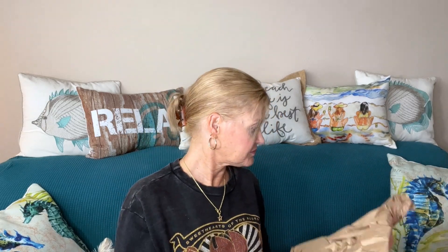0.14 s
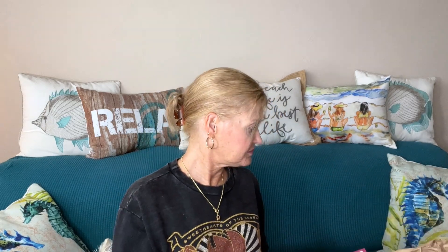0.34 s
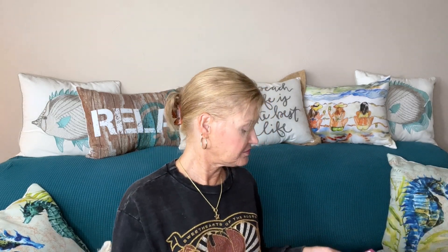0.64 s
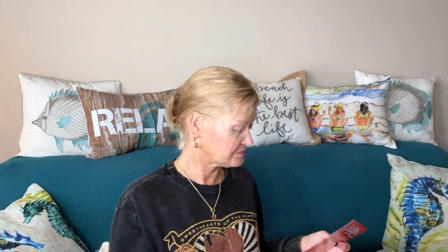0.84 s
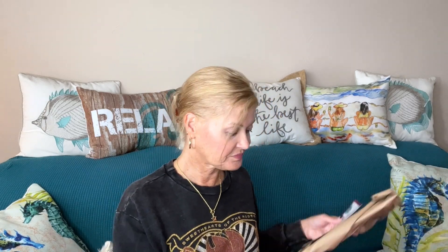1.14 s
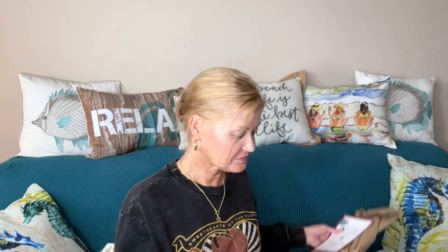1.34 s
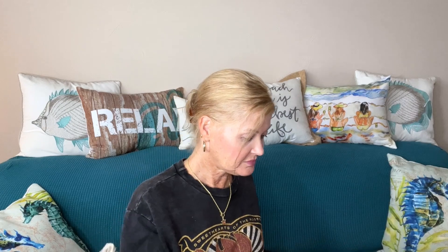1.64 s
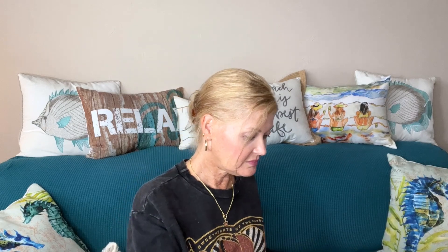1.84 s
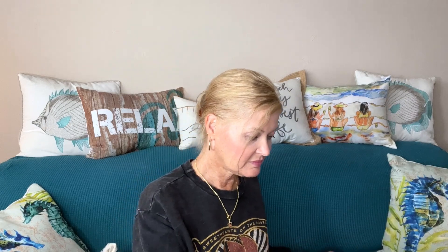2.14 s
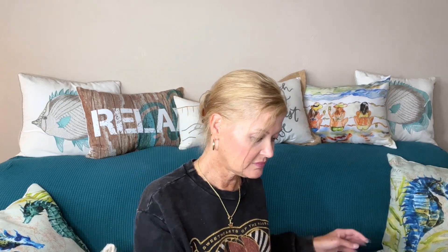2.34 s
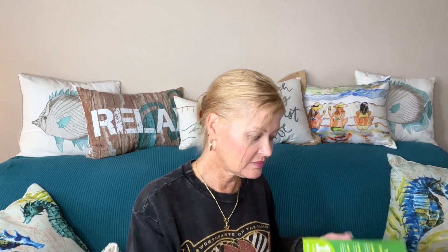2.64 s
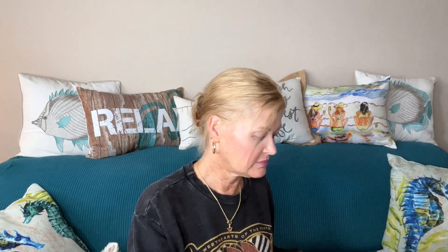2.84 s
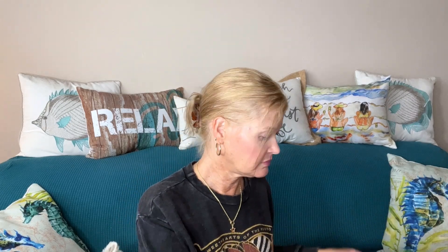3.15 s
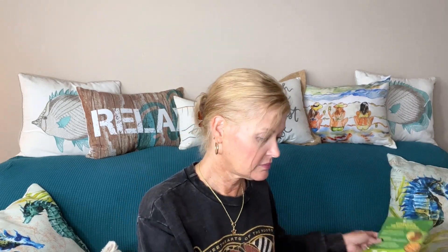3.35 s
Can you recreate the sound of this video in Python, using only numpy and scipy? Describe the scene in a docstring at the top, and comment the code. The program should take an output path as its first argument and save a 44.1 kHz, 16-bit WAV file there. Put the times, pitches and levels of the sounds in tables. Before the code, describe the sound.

Packing paper rustles and crackles in irregular bursts as hands dig in a cardboard box.

```python
"""Packing paper rustles from the first instant, over a faint appliance hum and the air of a soft furnished room.
Hands dig in a cardboard box to one side of a two-port microphone. Dense tiny buckles ring to make the rustle,
folds snap one by one as flurries of slips, and the box wall is rubbed and knocked so that its modes ring.
Late on, a small hard thing is tapped once. Short reflections surround paper, box and tap."""
import sys
import numpy as np
from scipy import signal
from scipy.fft import rfft, irfft, next_fast_len
from scipy.io import wavfile

SR = 44100
rng = np.random.default_rng(int(sys.argv[2]) if len(sys.argv) > 2 else 0)


def to_wav(sig):
    """Store sig (one row per channel, or 1-D mono) as 16-bit WAV at the path in sys.argv[1].

    Samples outside -1..1 are clipped; the rate is SR.
    """
    pcm = np.clip(np.atleast_2d(sig), -1, 1) * 32767
    pcm = np.round(pcm).astype(np.int16)
    wavfile.write(sys.argv[1], SR, pcm.T)  # frames by channels


def nominal_scale(level):
    """Amplitude ratio for a level in decibels (scalar or array-like)."""
    x = np.asarray(level, float) / 20
    return 10 ** x


N = 154350  # samples
PAD = next_fast_len(N + SR)
HZ = np.arange(PAD // 2 + 1) * SR / PAD

# Levels at the sources come before the ports, the room and the microphone's colour.

# appliance hum: (frequency [Hz], rms level [dB])
HUM_TONES = [(59, -78), (119, -57.5), (293, -72)]
HUM_WAVER_DB, HUM_WAVER_HZ = 1.2, 4.5
# spectrum of the room air: (frequency [Hz], relative level [dB])
AIR_SPECTRUM = [(30, 7.5), (70, 17), (140, 1.5), (400, -11), (1400, -18), (4000, -30), (7000, -35.5),
                (12000, -57)]
AIR_RMS_DB = -60

# the sheet is crumpled or dragged:
# (time [s], length [s], peak position [share of length], level [dB], brightness [dB per octave])
PAPER_STROKES = [(0.0, 0.023, 0.033, -33, -2.5), (0.049, .07, 0.48, -55, -1.5),
                 (0.106, 0.12, 0.5, -31.5, -1.5), (0.206, 0.086, 0.27, -42, 1.5),
                 (0.274, 0.079, 0.41, -37.5, .3), (0.376, 0.17, 0.25, -33.5, 3),
                 (0.546, 0.29, 0.36, -56, -2), (0.939, 0.19, 0.49, -32, 4), (1.109, 0.045, .2, -38.5, -1),
                 (1.161, 0.083, 0.37, -31, -0.9), (1.359, 0.019, 0.059, -40.5, -3),
                 (1.529, 0.19, 0.11, -35, 0.1), (1.669, 0.15, 0.054, -34, -1),
                 (1.835, 0.099, .15, -45, 1.5), (1.939, 0.19, 0.32, -35.5, 0.3),
                 (2.132, 0.12, 0.17, -32.5, -2.5), (2.277, .14, 0.84, -61.5, 4),
                 (2.638, 0.23, 0.42, -39, 1.5), (2.816, 0.05, 0.32, -33, -12),
                 (3.047, 0.16, 0.26, -36.5, -1.6), (3.209, 0.23, 0.49, -59, -5.5),
                 (3.453, 0.05, 0.78, -59, -7.5)]
# how strongly each size of buckle sounds: (frequency [Hz], relative level [dB])
BUCKLE_SPECTRUM = [(400, -4.5), (700, -7.5), (1200, 0.5), (2200, 1), (3200, -2.5), (4500, -7.5),
                   (6500, -13), (9000, -5), (12000, -3.5)]
PARTS, SIZES = 3, 34  # places on the sheet, sizes of buckle
BUCKLES_PER_S, BUCKLE_SPREAD_DB = 2000, 2.8  # in each part of the sheet
BUCKLE_CYCLES = 18  # cycles to fall 60 dB
BRIGHT_PIVOT_HZ = 2500
COLOUR_DB, COLOUR_HZ = 1.5, 21.8  # each size of buckle comes and goes

# shape of a hand stroke
ATTACK_S, ATTACK_SHARE = 0.002, 0.3  # the share is of the time to the peak
SWELL_DB, RELEASE_DB_PER_S = 12.5, 901

# the box wall is rubbed: (time [s], length [s], level [dB])
WALL_RUBS = [(0.091, 0.26, -38.5), (0.422, 0.14, -39.5), (0.969, 0.13, -33), (1.363, 0.041, -45),
             (1.545, 0.093, -39), (1.716, 0.093, -37.5), (1.934, 0.19, -36), (2.134, 0.11, -24.5),
             (2.642, 0.11, -39), (2.82, 0.042, -32), (3.067, 0.12, -38.5)]
# modes of the cardboard box: (frequency [Hz], relative level [dB], 60 dB decay [s])
BOX_MODES = [(162.6, -1, 0.038), (310, -5, 0.1), (398, 4, .04), (496, -3.5, .04), (642, 8.5, 0.017),
             (804, 1.5, 0.037)]
RUBS_PER_S, RUB_SPREAD_DB = 820, 5.5
RUB_PEAK = 0.38  # share of the length

# folds that snap and knocks on the wall:
# (time [s], level before SNAP_DB [dB], pitch [Hz], decay constant of the slips [ms])
FOLD_SNAPS = [(0.121, -22, 1580, 2.9), (0.161, -17.5, 1590, 4.5), (0.172, -17, 1106, 5.5),
              (0.239, -29.5, 1460, 6.2), (0.491, -33, 4700, 18), (0.592, -48.5, 1080, 22),
              (0.973, -34.5, 1810, 13), (1.015, -24, 5750, 6.1), (1.022, -27.5, 1240, 26),
              (1.051, -23, 1610, 17), (1.103, -20.5, 1730, 5), (1.354, -35.5, 2560, 2.35),
              (1.362, -29, 174.5, 14), (1.53, -24, 824, 3.3), (1.553, -30, 590, 2.2),
              (1.599, -24, 645, 5.2), (1.677, -16.5, 1412, 3.7), (1.851, -40.5, 1030, 9.1),
              (1.867, -31, 920, 6.7), (1.883, -35, 233, 3), (1.964, -33.5, 310, 3.7),
              (1.981, -31, 1390, 13), (2.004, -30, 1274, 14), (2.048, -34, 505, 28),
              (2.126, -25.5, 340, 19), (2.147, -19.5, 890, 5.2), (2.159, -26, 310, 19),
              (2.205, -31, 510, 10), (2.216, -24.5, 648, 1.9), (2.66, -29.5, 343, 35),
              (2.692, -28, 2170, 3.6), (2.786, -23, 1300, 3), (2.824, -15.5, 836, 9.3),
              (3.07, -21.5, 487, 2.6), (3.077, -16.5, 306, 12.2), (3.115, -30.5, 4700, 3),
              (3.182, -33.5, 1800, 2.6), (3.273, -46, 1060, 2.2), (3.329, -51, 2270, 4),
              (3.37, -55, 5230, 3.3)]
SNAP_DB, SNAP_CYCLES = 3.5, 4.4
SNAP_OVERTONE, OVERTONE_DB = 1.743, -8.5  # ratio to the pitch, relative level
CRACK_DB, CRACK_MS = -17, 1.6
WALL_HZ = 300  # knocks below this pitch sit on the wall and ring more cycles

# modes of the small hard thing: (frequency [Hz], relative level [dB], 60 dB decay [s])
TAP_MODES = [(1820, 1, 0.012), (2010, -2, 0.014), (2290, -1, .01), (3600, -9, .006)]
TAP_S, TAP_DB = 2.429, -48.5
TAP_CLICK_DB, TAP_RATTLE_DB, TAP_RATTLE_S = 16.5, -15, 0.03  # levels relative to the tap

# phase by which the left port leads: (frequency [Hz], lead [rad])
PORT_PHASE = [(0, 3.5), (780, -1.45), (2580, -2), (3620, -4.5), (4650, -9.5), (7920, 5.5), (9650, -3.5),
              (15800, -5)]
# phase step between neighbouring places on the sheet, as three places are used: (frequency [Hz], turn [rad])
PLACE_PHASE = [(100, 0.34), (500, 0.18), (2000, 0.34), (5000, 4.33), (10000, 0.17)]
LEFT_DB = -1.2  # left port relative to right

ROOM_T60_S, ROOM_DB, WALL_CUT_HZ, DELAYS = 0.15, -6, 16000, 20

# colour of the microphone: (frequency [Hz], gain [dB])
MICROPHONE_COLOUR = [(25, -49.5), (60, -29.5), (130, -12.5), (250, -8), (500, -0.24), (6500, 8), (7300, -3),
                     (8500, 5), (11000, -20.5), (15000, -21)]
SUM_CUT_HZ = 8770  # above this the two ports are out of step and their sum fades
SUM_LEAK_DB = -12  # what is left of the sum up there


def rms_one(x):
    """Scales a signal to an rms of 1."""
    return x / np.sqrt(np.mean(x ** 2) + 1e-20)


def at_hz(points, hz):
    """Reads a curve at given frequencies, on a logarithmic frequency scale."""
    f, v = np.transpose(points)
    return np.interp(np.log(hz + 1), np.log(f + 1), v)


def drift(rate):
    """Random wander of spread 1: noise through two equal low-pass poles at rate [Hz]."""
    r = np.exp(-2 * np.pi * rate / SR)
    wander = signal.lfilter([1], [1, -2 * r, r * r], rng.standard_normal(N + SR))
    return rms_one(wander[SR:])


def ring(drive, hz, t60):
    """A resonance: a unit click sets a dying sine of starting height 1 ringing."""
    r, w = nominal_scale(-60 / (t60 * SR)), 2 * np.pi * hz / SR
    return signal.lfilter([0, np.sin(w)], [1, -2 * r * np.cos(w), r * r], drive + 1e-18)


def clicks(rate, spread_db):
    """Random clicks of either sign, mostly small, a few large."""
    sizes = nominal_scale(spread_db * np.minimum(rng.exponential(1, N), 5.0)) * rng.choice([-1, 1], N)
    return sizes * (rng.random(N) < rate / SR)


def strokes(s, length, peak, db):
    """Gains of hand strokes: a start the softer the later the peak, a swell to it and back, a quick end."""
    t = np.arange(N)[:, None] / SR - s
    peak = np.clip(peak, .05, .95)
    before_peak = 1 - t / (length * peak)
    after_peak = (np.minimum(t / length, 1) - peak) / (1 - peak)
    below_peak = np.minimum(np.maximum(before_peak, after_peak), 1)
    release = RELEASE_DB_PER_S * np.clip(t - length, 0, .2)
    attack = np.clip(t / (ATTACK_S + ATTACK_SHARE * length * peak), 0, 1) ** 2
    return nominal_scale(db - SWELL_DB * below_peak - release) * attack


def background():
    """Room air as shaped noise, partly shared by both sides, and hum tones that waver in level."""
    white = rng.standard_normal((2, PAD)) + rng.standard_normal(PAD)
    air = irfft(rfft(white) * nominal_scale(at_hz(AIR_SPECTRUM, HZ)), PAD)[:, :N]
    t = np.arange(N) / SR
    hum = np.zeros(N)
    for hz, db in HUM_TONES:
        level = np.sqrt(2) * nominal_scale(db + HUM_WAVER_DB * drift(HUM_WAVER_HZ))
        hum += level * np.sin(2 * np.pi * (hz * t + rng.random()))
    return nominal_scale(AIR_RMS_DB) * rms_one(air) + hum


def rustle(bright_db):
    """Buckles of all sizes, each struck by its share of clicks; one row for each part of the sheet."""
    train = clicks(BUCKLES_PER_S * PARTS, BUCKLE_SPREAD_DB)
    dealt = rng.integers(0, SIZES * PARTS, N)  # which size and part each click falls to
    out = np.zeros((PARTS, N))
    for k, hz in enumerate(np.geomspace(400, 13000, SIZES)):
        tilt = bright_db * np.log2(hz / BRIGHT_PIVOT_HZ)
        gain = nominal_scale(at_hz(BUCKLE_SPECTRUM, hz) + tilt + COLOUR_DB * drift(COLOUR_HZ))
        for part in range(PARTS):
            struck = train * (dealt == k * PARTS + part)
            rung = ring(struck, hz * rng.uniform(1.0, 1.05), BUCKLE_CYCLES / hz)
            out[part] += gain * np.sqrt(hz / BRIGHT_PIVOT_HZ) * rms_one(rung)
    return rms_one(out) / np.sqrt(PARTS)


def box_rub(gain):
    """Paper and hands drag on the wall as random clicks, and the wall's modes answer."""
    drive = clicks(RUBS_PER_S, RUB_SPREAD_DB)
    steady = sum(nominal_scale(db) * ring(drive, hz, t60) for hz, db, t60 in BOX_MODES)
    rubbed = sum(nominal_scale(db) * ring(drive * gain, hz, t60) for hz, db, t60 in BOX_MODES)
    return rubbed / np.sqrt(np.mean(steady ** 2))


def snaps():
    """A crack, soft for low knocks, with a dying flurry of slips that rings the fold at its pitch."""
    span = SR // 5
    out = np.zeros((PARTS, N + SR))
    t_ms = np.arange(span) / SR * 1000
    for k, (s, db, hz, ms) in enumerate(FOLD_SNAPS):
        slips, grit = rng.standard_normal((2, span))
        flurry = slips * np.abs(slips) * np.exp(-t_ms / max(ms, .3))
        body = np.zeros(span)
        for f, level_db in [(hz, 0), (hz * SNAP_OVERTONE, OVERTONE_DB)]:
            t60 = SNAP_CYCLES / f
            fold = ring(flurry, f, t60)
            body += nominal_scale(level_db) * rms_one(ring(fold, f, t60 * (1 + (WALL_HZ / f) ** 2)))
        crack = grit * np.abs(grit) * np.exp(-t_ms / CRACK_MS)
        crack_gain = nominal_scale(CRACK_DB) * min(hz / (2 * WALL_HZ), 1) ** 2
        sound = body / np.abs(body).max() + crack_gain * crack
        i = int(s * SR)
        out[k % PARTS, i:i + span] += nominal_scale(db + SNAP_DB) * sound
    return out[:, :N]


def tap():
    """A small hard thing struck once: a noise click and a dying rattle drive its modes."""
    t = np.arange(N) / SR - TAP_S
    noise = rng.standard_normal(N) * (t > 0)
    click = noise * np.exp(-np.abs(t) * 1000 / CRACK_MS)
    drive = click + nominal_scale(TAP_RATTLE_DB) * noise * np.exp(-np.abs(t) / TAP_RATTLE_S)
    modes = sum(nominal_scale(db) * ring(drive, hz, t60) for hz, db, t60 in TAP_MODES)
    return nominal_scale(TAP_DB) * (nominal_scale(TAP_CLICK_DB) * np.gradient(click) + modes)


def ports(parts):
    """Each place reaches the two ports with the shared phase lead and a turn of its own."""
    place = np.linspace(-1, 1, PARTS)[:, None]
    turn = at_hz(PORT_PHASE, HZ) + at_hz(PLACE_PHASE, HZ) * place
    spec = rfft(parts, PAD)
    pair = []
    for sign in (1, -1):  # left, right
        heard = np.sum(spec * np.exp(.5j * sign * turn), axis=0)
        pair.append(heard * nominal_scale(sign * LEFT_DB / 2))
    return irfft(np.array(pair), PAD)[:, :N]


def room(x):
    """Reflections from ten feedback delays a side, duller on every round."""
    dull = 1 / np.sqrt(1 + (HZ / WALL_CUT_HZ) ** 2)
    out = np.zeros((2, len(HZ)), complex)
    for k, lag in enumerate(rng.uniform(0.0044, 0.025, DELAYS)):  # seconds
        loss = nominal_scale(-60 * lag / ROOM_T60_S) * dull ** (lag / .02)
        loop = loss * np.exp(-2j * np.pi * HZ * lag)
        out[k % 2] += loop / (1 - loop) * (-1) ** (k // 2)
    return irfft(out * rfft(x, PAD), PAD)[:, :N] / np.sqrt(DELAYS / 2)


def scene():
    """Paper, box and tap, direct and through the room, over the background."""
    *shape, bright_db = np.transpose(PAPER_STROKES)
    gains = strokes(*shape) + 1e-9
    paper = gains.sum(axis=1)
    brightness = gains @ bright_db / paper  # sounding strokes blend their brightness, each weighted by its gain
    parts = paper * rustle(brightness) + snaps()
    s, length, db = np.transpose(WALL_RUBS)
    parts[1] += box_rub(strokes(s, length, RUB_PEAK, db).sum(axis=1))
    parts[2] += tap()
    direct = ports(parts)
    return direct + nominal_scale(ROOM_DB) * room(direct) + background()


def top_cut(x):
    """Nothing passes above the cut-off."""
    return signal.sosfilt(signal.butter(12, 16250, fs=SR, output="sos"), x)


def record(dry):
    """The microphone colours both ports, and the sum of the ports loses its top."""
    left, right = rfft(dry, PAD) * nominal_scale(at_hz(MICROPHONE_COLOUR, HZ))
    sum_gain = np.maximum(1 / (1 + (HZ / SUM_CUT_HZ) ** 20), nominal_scale(SUM_LEAK_DB))
    mid = (left + right) / 2 * sum_gain
    side = (left - right) / 2
    mix = irfft(np.array([mid + side, mid - side]), PAD)[:, :N]
    return top_cut(mix)


dry = scene()
out = record(dry)
to_wav(out)
```